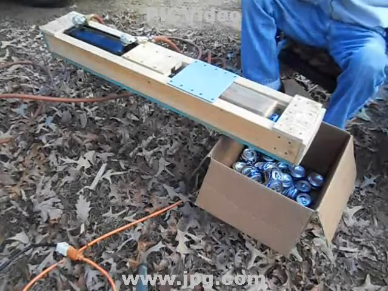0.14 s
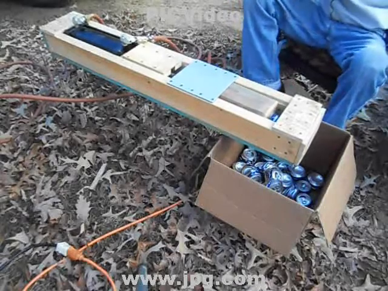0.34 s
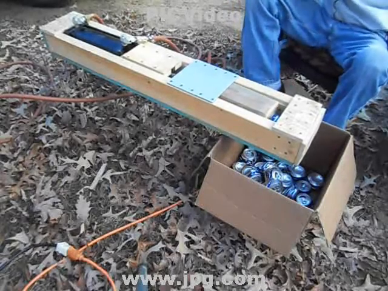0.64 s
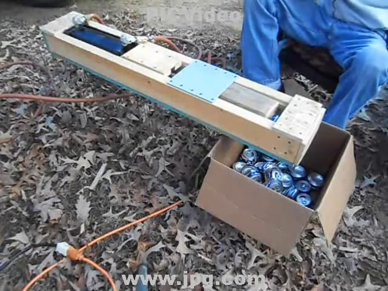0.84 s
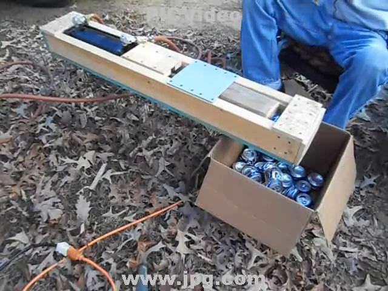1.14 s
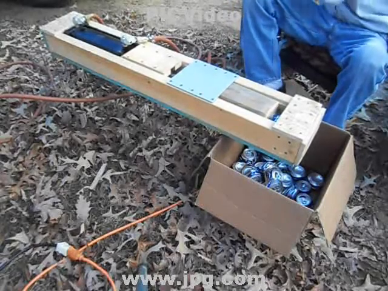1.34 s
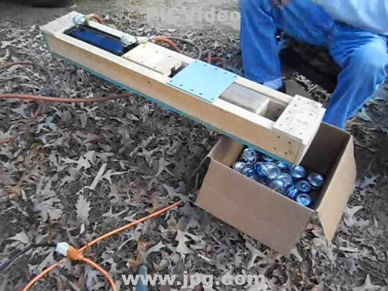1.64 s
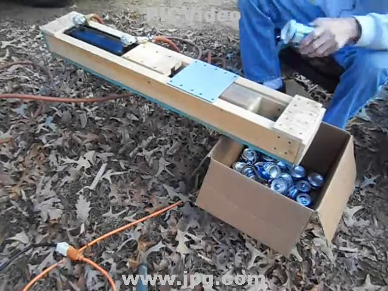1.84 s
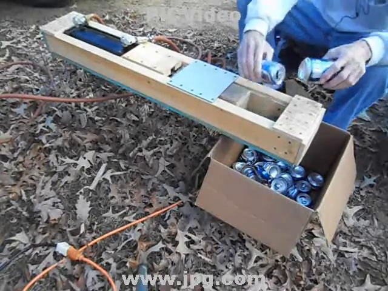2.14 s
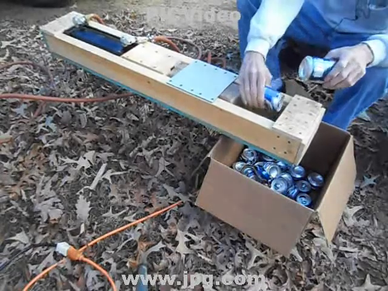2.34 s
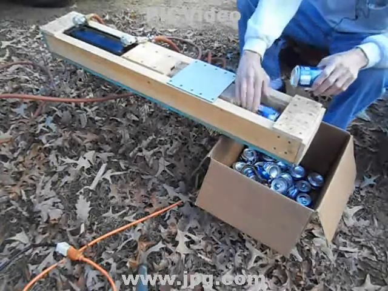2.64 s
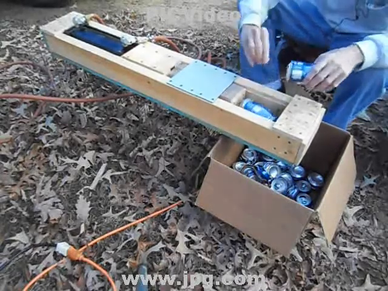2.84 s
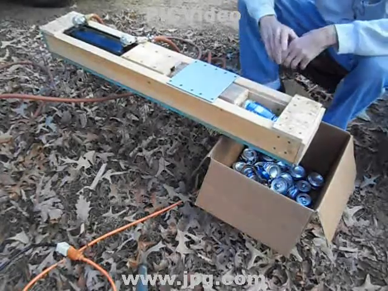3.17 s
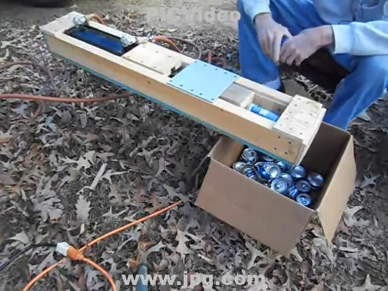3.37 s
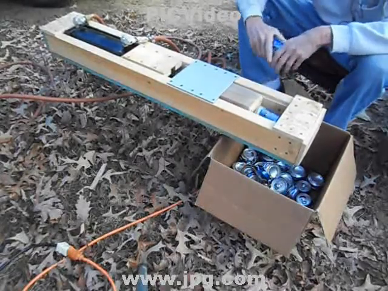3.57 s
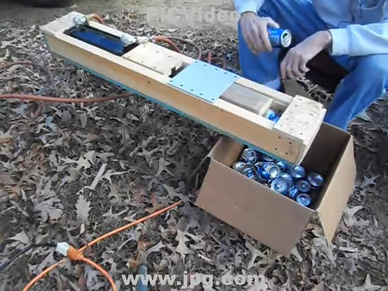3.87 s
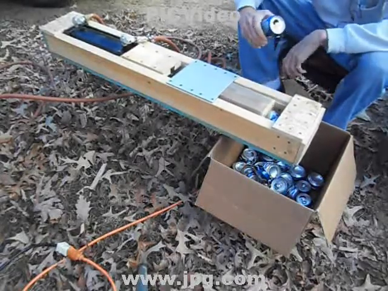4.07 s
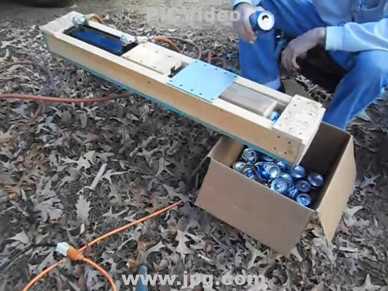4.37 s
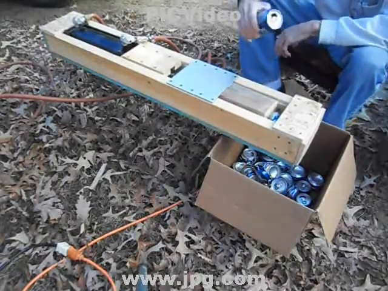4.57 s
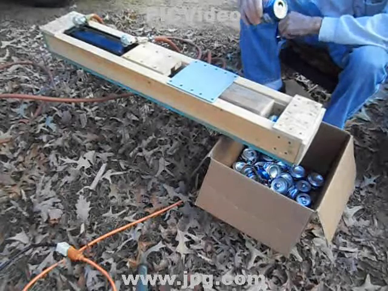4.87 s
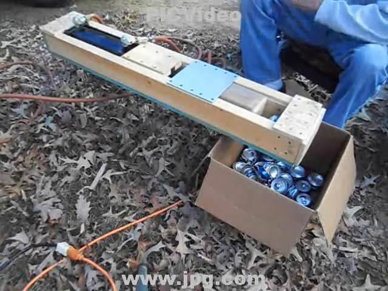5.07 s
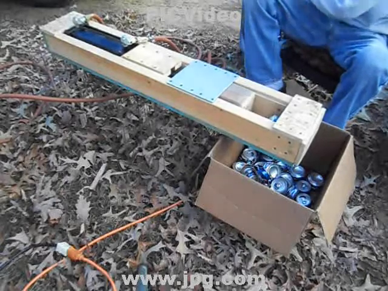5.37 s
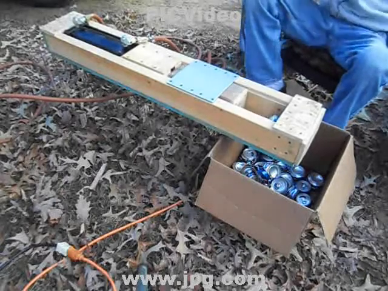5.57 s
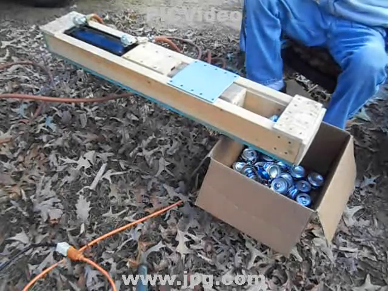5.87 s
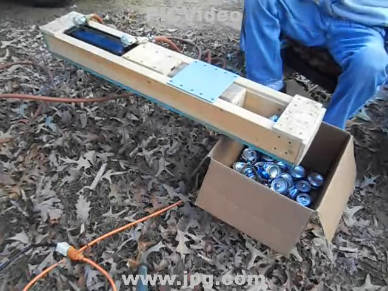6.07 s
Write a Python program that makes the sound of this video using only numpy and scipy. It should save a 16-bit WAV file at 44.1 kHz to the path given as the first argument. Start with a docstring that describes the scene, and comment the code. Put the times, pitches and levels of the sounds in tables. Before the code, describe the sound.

Close, dry outdoor sound of a compressed-air can crusher in a wooden trough. A dying hiss and sharp metal snaps, then a long bright vent as the ram slides back. An empty can drops in, bouncing with a tinny rattle; another hiss drives the ram, with dense crackling, wooden knocks and tiny squeaks. A faint whistle ends the air, then the ram vents back again.

```python
"""A home-made pneumatic can crusher, a wooden trough with an air cylinder, works outdoors on dry leaves.
As a crush stroke's hiss runs out, thin metal snaps; then the ram slides back while its valve vents noise
through a resonant port. A dropped can bounces as struck modes, then snaps, knocks and squeaks under the
next crush stroke; the air ends in a gliding whistle and the ram returns. Damped modes make the wooden
knocks; shaped noise makes the scrapes, the rustle of clothes and leaves, the rumble and the still air."""
import sys
import numpy as np
from scipy import signal
from scipy.fft import rfft, irfft
from scipy.io import wavfile
from scipy.ndimage import map_coordinates

SR = 44100
rng = np.random.default_rng(int(sys.argv[2]) if len(sys.argv) > 2 else 0)


def generate_wav(sig):
    """Save sig (samples, or channels by samples) to the path in sys.argv[1] as 16-bit PCM at SR."""
    pcm = np.round(np.clip(np.atleast_2d(sig).T, -1, 1) * 32767).astype(np.int16)
    wavfile.write(sys.argv[1], SR, pcm)


N = 273861
TIME = np.arange(N) / SR
BINS_HZ = np.maximum(np.arange(N // 2 + 1) * SR / N, 1)
CUTOFF_HZ = 15550

# All levels and spectral densities below are relative; each sound's own trims are added to them.
# Strokes in which the ram slides back:
# (valve opens [s], travel [s], hiss level [dB], surge of the full cylinder [dB])
RETURN_STROKES = [(1.243, 1.107, -19, 6), (4.676, 0.99, -19, 1.5)]
# Strokes in which the ram crushes a can:
# (valve opens [s], travel [s], hiss level [dB], surge of the full cylinder [dB])
CRUSH_STROKES = [(-0.98, 0.8, -16, 6), (2.972, 0.84, -18.5, 6)]
# Turbulence spectrum of each exhaust port: (frequency [Hz], density [dB per Hz])
RETURN_JET = [(150, -40.5), (300, -34.5), (600, -25.5), (1100, -23), (2600, -22.5), (3500, -13),
              (5500, -22), (7000, -24.5), (8400, -36.5), (11500, -40), (15000, -33.5)]
CRUSH_JET = [(150, -37), (400, -23), (900, -16.5), (2400, -16.5), (4300, -14.5), (6000, -9.5), (8200, -29),
             (11000, -24.5), (15000, -24)]
# Resonances and notches of each port and its air line: (centre [Hz], width [Hz], lift [dB])
RETURN_PORT = [(1334, 145, 13), (1730, 130, 9.5), (2327, 138, 11), (3017, 730, 6.5), (3468, 420, 9.5),
               (3834, 55, -10.5), (4155, 570, 12.5), (4706, 60, -8.5), (4780, 160, 11.5), (5020, 160, 10.5),
               (5475, 287, 13), (5950, 680, 5), (7200, 160, -12.5), (7600, 400, 1), (9170, 250, 6.5),
               (10070, 700, 15), (10540, 75, 11.5), (11460, 130, 14.5), (12060, 410, 17.5)]
CRUSH_PORT = [(1670, 110, 7), (2280, 90, 6), (3110, 710, 9), (4145, 630, 16.5), (4530, 68, -4.5),
              (4710, 250, 9), (4930, 240, 8.5), (5340, 64, 11), (5980, 130, 6.5), (6630, 140, 3.5),
              (7600, 380, 5.5), (9500, 580, 8)]
# Resonances in the first blast of a return stroke: (centre [Hz], width [Hz], lift [dB])
BLAST_PORT = [(1350, 160, 0.5), (2230, 260, 16), (3200, 690, 22.5), (5000, 460, 14.5), (6240, 340, 17),
              (7640, 950, 14.5), (9070, 480, 22.5), (9580, 610, 13), (12300, 1300, 12), (14800, 900, 17.5)]
# Faint whistle of the last leaking air: (time [s], frequency [Hz], level [dB])
WHISTLE = [(4.18, 7900, -65), (4.205, 8080, -57), (4.235, 7900, -56), (4.265, 7300, -54), (4.30, 6830, -68),
           (4.35, 6870, -64), (4.385, 7600, -58), (4.41, 8600, -68)]
# After the ram stops, the hiss falls as time squared; sizzle falls this many times as fast in dB
EMPTYING_DB_PER_S2, SIZZLE_FOLLOWS = 213, 1.28

# Edges of the hollow, crack and bright bands of a snap; the inner two also split the hiss: (edge [Hz])
BAND_EDGES_HZ = (900, 2600, 6600, 15000)
# Thin aluminium snapping and buckling: (time [s], crack level [dB], treble boost [dB])
SNAPS = [(0.0287, -20, -6), (0.0406, -20, -8.5), (0.0682, -32, -1), (0.0916, -27, -4), (0.2633, -43, 1),
         (0.408, -22.5, -11.5), (0.433, -27.5, -11), (0.6537, -27, -0.5), (0.7286, -12.5, -4),
         (0.8142, -26.5, 2), (1.1833, -3, -3.5), (1.235, -20, -17), (1.2466, -8, -21), (1.652, -19, 0.5),
         (3.365, -7, -40), (3.3726, -2, -16), (3.498, -12, -34), (3.5499, -3, -21), (3.5912, -6, -16),
         (3.6055, -5, -7.5), (3.6259, -10.5, -18), (3.7575, -10, -18), (3.7881, 0, -11), (3.7967, -3, -18),
         (3.8341, -5, -5), (3.952, -18.5, -0.5), (3.9648, -19, -4), (3.9712, -17, -20),
         (4.0149, -11.5, -22), (4.0591, -8, -5), (4.142, -24.5, -1), (4.151, -14, -4.5),
         (4.2039, -25.5, -19), (4.4857, -15, -11), (4.563, -20, -9.5), (4.6088, -37, -18)]
# Basic ring of a snap; the hollow band loses this many dB for each dB of treble boost
SNAP_T60_S, HOLLOW_TRADE = 0.022, 0.48
# The empty can lands and bounces: (time [s], ring level [dB], clatter level [dB], base thud level [dB])
CAN_BOUNCES = [(2.7306, -24, -20, -1), (2.738, -36.5, -22, -13), (2.754, -40.5, -21, -25),
               (2.769, -30.5, -21.5, -14), (2.910, -31.5, -32, -16)]
# Modes of the empty can: (frequency [Hz], level [dB], t60 [s])
CAN = [(1101, -3.5, 0.45), (1173, -9, 0.87), (1450, -9.5, 0.6), (1530, -15, 0.18), (1805, -6, .17),
       (2220, -9, 0.62), (2830, -13, .14), (2995, -12.5, 0.2), (3000, 3.5, .14), (3300, -2, 0.25),
       (3570, -4, .12), (4130, -1, 0.15), (4270, 6, 0.082), (4620, -2.5, 0.079)]
# Modes of the can's base, damped by the wood it hits: (frequency [Hz], level [dB], t60 [s])
CAN_BASE = [(770, -21, 0.016), (1020, -1.5, 0.034), (1094, -8, 0.031)]
# Metal slipping on the ram, one list a squeak: (time [s], frequency [Hz], level [dB])
SQUEAKS = [
    [(3.564, 2420, -28), (3.571, 2610, -14), (3.579, 2660, -26)],
    [(3.594, 2420, -31), (3.599, 2585, -16), (3.604, 2314, -16), (3.609, 2850, -10.5), (3.614, 3000, -39)],
]
# Harmonics of a squeak: (multiple of the pitch [1], level [dB])
SQUEAK_TONE = [(1, -1.5), (2, 0), (3, -5.5), (4, -30), (5, -10)]

# Knocks of ram and can in the trough: (time [s], level [dB], centre of the blow's excitation [Hz])
KNOCKS = [(0.499, -37.5, 900), (1.121, -35, 940), (1.246, -17, 464), (1.382, -23.5, 524), (1.653, -32, 620),
          (2.358, -26.5, 430), (2.732, -17.5, 970), (2.767, -21, 800), (2.825, -28, 900),
          (2.909, -20.5, 940), (2.986, -22, 950), (3.172, -30, 430), (3.187, -29.5, 910), (3.224, -23, 970),
          (3.292, -25, 990), (3.363, -15.5, 1150), (3.413, -24, 540), (3.448, -32, 600), (3.480, -24, 835),
          (3.497, -23.5, 740), (3.548, -25, 990), (3.715, -36, 450), (3.789, -32.5, 750),
          (3.821, -27.5, 1260), (4.016, -42, 875), (4.486, -44.5, 455), (4.806, -21.5, 410),
          (4.918, -26.5, 930), (5.703, -23.5, 520)]
# Response of the wooden trough: (frequency [Hz], level [dB])
TROUGH = [(150, -7), (270, 3.5), (340, -7), (440, 2.5), (540, -6), (700, 3.5), (1020, 0), (1300, 2),
          (1800, -5), (2600, -9.5)]
# Basic ring of a knock; the full blow builds up over this many cycles of its pitch
KNOCK_T60_S, CONTACT_CYCLES = 0.057, 2.75
# The light, hard touch that opens a knock: level and pitch relative to the full blow, and its rise
TOUCH_DB, TOUCH_RATIO, TOUCH_RISE_S = -9.5, 1.57, 0.0012
# The ram rubs along the trough: (start [s], end [s], level [dB])
SCRAPES = [(1.647, 1.767, -23.5), (2.334, 2.39, -30), (3.356, 3.436, -30), (3.474, 3.519, -29)]
# Spectrum of that rubbing: (frequency [Hz], density [dB per Hz])
SCRAPE = [(100, -8), (250, -9), (500, -11), (850, -2.5), (1500, -1.5), (3000, -4.5), (8000, -11.5),
          (15000, -30)]

# The operator shifts and handles cans:
# (start [s], length [s], rustle level [dB], dull rubbing level [dB])
MOVES = [(-0.05, 1.3, -56.5, -57), (0.216, 0.072, -49, -45.5), (0.492, 0.055, -52, -48),
         (0.728, 0.33, -47.5, -49), (0.903, 0.044, -41, -37.5), (1.044, 0.14, -41, -43.5),
         (2.6, 0.25, -40.5, -66), (2.856, 0.53, -36.5, -63), (5.935, 0.31, -46.5, -53),
         (6.17, 0.044, -48, -47)]
MOVE_ATTACK_S, MOVE_RELEASE_S = 0.013, 0.043
# Spectra of cloth and dry leaves, and of dull rubbing: (frequency [Hz], density [dB per Hz])
RUSTLE = [(500, -13), (1000, -0.5), (2000, -5.5), (4000, -3.5), (6500, -7.5), (10000, -12.5), (15000, -15)]
RUBBING = [(100, -18.5), (200, -5.5), (265, 2.5), (360, -8), (700, -8.5), (1100, -12.5), (2200, -42.5)]
# Swells of low rumble: (middle [s], half width [s], level [dB])
RUMBLES = [(0.93, 0.12, -57), (1.21, 0.06, -44), (3.6, 0.25, -60.5), (5.04, 0.072, -54), (6.12, 0.087, -55)]
RUMBLE_REST_DB, AIR_DB = -70.5, -56.5
# Spectra of the rumble and the still outdoor air: (frequency [Hz], density [dB per Hz])
RUMBLE = [(20, 6), (50, -6.5), (120, 0), (200, -8), (400, -23), (900, -49.5)]
AIR = [(25, -6.5), (160, -19.5), (300, -14.5), (550, -10), (850, -16.5), (2500, -20.5), (4000, -15),
       (6000, -21.5), (11000, -27), (15000, -19)]


def exhaust(strokes, jet, port, level_db, opening_s, surge_s, trend_db_per_s, sizzle_db, spit_db, spit_s,
            dulling_db_per_s, rush_db, rush_follows, flutter_db):
    """Turbulence in a resonant port: it spits on opening, dulls with travel and runs out treble first."""
    low, middle, high = three_bands(noise(jet, port))
    out = np.zeros(N)
    for stroke in strokes:
        age, travelling_db, fall_db = venting(stroke, surge_s, trend_db_per_s)
        opening = np.minimum(age / opening_s, 1)
        spit = spit_db * np.exp(-age / spit_s)
        high_db = sizzle_db + spit - dulling_db_per_s * age + SIZZLE_FOLLOWS * fall_db
        sizzle = from_db(high_db) * high
        rush = from_db(rush_db + rush_follows * fall_db) * low
        hiss = from_db(fall_db) * middle
        out += opening * from_db(travelling_db) * (hiss + sizzle + rush)
    return out * from_db(level_db + flutter_db * drift(150))


def venting(stroke, surge_s, trend_db_per_s):
    """Discharge of a cylinder: valve age, hiss level with its decaying surge, and fall after the ram stops."""
    start, travel_s, db, surge_db = stroke
    age = np.maximum(TIME - start, 0)
    travelling_db = db + surge_db * np.exp(-age / surge_s) + trend_db_per_s * age
    fall_db = -EMPTYING_DB_PER_S2 * np.maximum(age - travel_s, 0) ** 2
    return age, travelling_db, fall_db


def first_blast(level_db, rise_s, fade_s):
    """Exponential pressure decay: the full cylinder vents with a harsher colour that dies away."""
    pressure = np.zeros(N)
    pulse = np.minimum(TIME / rise_s, 1) ** 2 * np.exp(-TIME / fade_s)
    for start, _, hiss_db, surge_db in RETURN_STROKES:
        add(pressure, start, from_db(hiss_db + surge_db + level_db) * pulse)
    return pressure * noise(RETURN_JET, BLAST_PORT)


def glide(rows, harmonics, jitter, jitter_rate):
    """Frequency-modulated harmonic tone: an unsteady pitch from slipping metal or leaking air."""
    s, hz, db = np.transpose(rows)
    t = np.arange(s[0], s[-1], 1 / SR)
    unsteady_hz = np.interp(t, s, hz) * (1 + jitter * drift(jitter_rate)[:len(t)])
    phase = 2 * np.pi * np.cumsum(unsteady_hz) / SR
    tone = sum(from_db(level) * np.sin(round(k) * phase) for k, level in harmonics)
    envelope = from_db(np.interp(t, s, db)) * signal.windows.tukey(len(t), .2)
    out = np.zeros(N)
    add(out, s[0], envelope * tone / rms(tone))
    return out


def snaps(hollow_db, crack_db, bright_db, hollow_ring, rise_s, run_s, count=44):
    """Buckling of a thin shell: a running fold changes its shape, so each snap rings with new modes."""
    out, t = np.zeros(N), TIME[:SR // 12]
    # While the fold runs, a rising gain offsets the basic decay
    running = np.minimum(t / rise_s, 1) * from_db(60 * np.minimum(t, run_s) / SNAP_T60_S)
    ring_factors = (hollow_ring, .9, .8)
    for s, db, brightness in SNAPS:
        levels = (hollow_db - HOLLOW_TRADE * brightness, crack_db, bright_db + brightness)
        for low, high, part_db, lasts in zip(BAND_EDGES_HZ, BAND_EDGES_HZ[1:], levels, ring_factors):
            hz = scattered(low, high, count=count)
            gains = rng.rayleigh(1, count)
            t60 = SNAP_T60_S * lasts * rng.uniform(1.0, 1.38, count)
            modes = running * ring(hz, gains, t60, 1 / 10)[:len(t)]
            add(out, s, from_db(db + part_db) * modes / rms(modes[:SR // 200]))
    return out


def dropped_can(clatter_t60, clatter_hz, clatter_octaves, count=140):
    """Modal response to impact: at each bounce the base thuds, the thin wall clatters and a few modes ring."""
    out = np.zeros(N)
    wall_hz = scattered(900, 12000, count=count)
    wall_gains = 1 / (1 + (np.log2(wall_hz / clatter_hz) / clatter_octaves) ** 2)
    wall_gains = wall_gains / (1 + (wall_hz / 5200) ** 4)
    for s, ring_db, clatter_db, thud_db in CAN_BOUNCES:
        for modes, level_db in ((CAN, ring_db), (CAN_BASE, thud_db)):
            hz, db, t60 = np.transpose(modes)
            gains = from_db(db + level_db + rng.normal(0, 1, len(hz)))
            add(out, s, ring(hz, gains, t60, .5))
        wall_t60 = clatter_t60 * rng.uniform(0.41, 1.43, count)
        clatter = ring(wall_hz, wall_gains, wall_t60, 1 / 5)
        add(out, s, from_db(clatter_db) * clatter / rms(clatter[:SR // 100]))
    return out


def knocks(level_db, spread_octaves, count=48):
    """Contact excitation of damped modes: a hard touch, then a full blow, centred by contact hardness."""
    out, t = np.zeros(N), TIME[:int(SR / 6)]
    body_hz, body_db = np.transpose(TROUGH)
    for s, db, pitch_hz in KNOCKS:
        touch = (TOUCH_DB, pitch_hz * TOUCH_RATIO, TOUCH_RISE_S)
        full_blow = (0, pitch_hz, CONTACT_CYCLES / pitch_hz)
        for part_db, centre_hz, rise_s in (touch, full_blow):
            hz = scattered(body_hz[0], body_hz[-1], count=count)
            excitation = 1 / (1 + (np.log2(hz / centre_hz) / spread_octaves) ** 2)
            gains = from_db(np.interp(hz, body_hz, body_db)) * excitation
            t60 = KNOCK_T60_S * rng.uniform(0.76, 1.3, count)
            blow = ring(hz, gains, t60, 1 / 5)[:len(t)]
            blow = blow * np.sin(np.pi / 2 * np.minimum(t / rise_s, 1)) ** 2
            add(out, s, from_db(db + level_db + part_db) * blow / rms(blow[:SR // 100]))
    return out


def scrapes(grain_db):
    """Stick-slip friction of wood on wood, rendered as noise in uneven grains."""
    level = np.zeros(N)
    for start, end, db in SCRAPES:
        corners = [start, start + 0.0084, (start + end) / 2, end]
        level += from_db(db) * np.interp(TIME, corners, [0, 1, 1, 0])
    return level * from_db(grain_db * drift(250)) * noise(SCRAPE)


def radiated(x, lowest_hz):
    """Radiation efficiency: small bodies in the open give off little bass."""
    return signal.sosfilt(signal.butter(3, lowest_hz, "high", fs=SR, output="sos"), x)


def yard(x, level_db, t60, dull_hz):
    """Diffuse scattering: ground, box and trough add a short, dull, decaying tail."""
    t = TIME[:SR // 4]
    tail = rng.standard_normal(len(t)) * np.exp(-np.log(1000) * t / t60) * (t > .004)
    tail = signal.sosfilt(signal.butter(1, dull_hz, fs=SR, output="sos"), tail)
    tail = tail / np.sqrt(np.sum(tail ** 2))
    return x + from_db(level_db) * signal.fftconvolve(x, tail)[:N]


def movement(grain_db, rub_db):
    """Friction noise with powers summed: cloth and dry leaves rustle in grains over a dull rubbing."""
    rustle_power, rubbing_power = np.zeros((2, N))
    for start, length, rustle_db, rubbing_db in MOVES:
        attack = np.clip((TIME - start) / MOVE_ATTACK_S, 0, 1)
        effort = attack * np.exp(-np.maximum(TIME - start - length, 0) / MOVE_RELEASE_S)
        rustle_power += (from_db(rustle_db) * effort) ** 2
        rubbing_power += (from_db(rubbing_db) * effort) ** 2
    rustle = np.sqrt(rustle_power) * from_db(grain_db * drift(400)) * noise(RUSTLE)
    rubbing = np.sqrt(rubbing_power) * from_db(rub_db * np.tanh(drift(40))) * noise(RUBBING)
    return rustle + rubbing


def rumble():
    """Amplitude-modulated low noise: a faint rumble swells now and then."""
    swells = sum(from_db(db) * np.exp(-((TIME - s) / width) ** 2) for s, width, db in RUMBLES)
    return (from_db(RUMBLE_REST_DB) + swells) * noise(RUMBLE)


def still_air():
    """Stationary broadband noise: the steady outdoor background."""
    return from_db(AIR_DB) * noise(AIR)


def noise(spectrum, resonances=()):
    """Spectral shaping: noise of rms 1 with a broad spectrum, lifted or notched at resonances."""
    hz, db = np.transpose(spectrum)
    level = np.interp(np.log(BINS_HZ), np.log(hz), db)
    for centre, width, lift in resonances:
        level = level + lift / (1 + (2 * (BINS_HZ - centre) / width) ** 2)
    shaped = rfft(rng.standard_normal(N)) * from_db(level) * (BINS_HZ < CUTOFF_HZ)
    x = irfft(shaped, N)
    return x / rms(x)


def three_bands(x):
    """Band splitting: the low, middle and high part of a sound, each of rms 1."""
    spectrum, band = rfft(x), np.digitize(BINS_HZ, BAND_EDGES_HZ[1:3])
    parts = [irfft(spectrum * (band == k), N) for k in range(3)]
    return [p / rms(p) for p in parts]


def ring(hz, gains, t60, seconds):
    """Modal superposition: struck modes are exponentially decaying sines of random phase."""
    t = np.float32(TIME[:int(seconds * SR)])
    phase = np.float32(rng.uniform(0, 2 * np.pi, (len(hz), 1)))
    speed, damping = np.float32(2 * np.pi * hz), np.float32(np.log(1000) / t60)
    modes = np.sin(np.outer(speed, t) + phase) * np.exp(-np.outer(damping, t))
    return np.float32(gains) @ modes


def scattered(low_hz, high_hz, count):
    """Modal density: random mode frequencies strewn evenly in pitch over a band."""
    return low_hz * (high_hz / low_hz) ** ((np.arange(count) + rng.random(count)) / count)


def drift(rate):
    """Interpolated random process: a wander of spread 1 with this many knots a second."""
    knots = rng.standard_normal(4000)
    # Linear interpolation averages the variance down to 2/3
    return map_coordinates(knots, [TIME * rate], order=1, mode="wrap") / np.sqrt(2 / 3)


def from_db(db):
    """Logarithmic level: decibels to amplitude gain."""
    return 10 ** (np.asarray(db) / 20)


def rms(x):
    """Effective value: the root mean square."""
    return np.sqrt(np.mean(x ** 2) + 1e-20)


def add(out, s, sound):
    """Linear superposition: mix a sound in at a time in seconds."""
    i = max(round(s * SR), 0)
    out[i:i + len(sound)] += sound[:N - i]


def scene():
    """Superposition of exhausts, blows and background, the same in both channels."""
    air = exhaust(RETURN_STROKES, RETURN_JET, RETURN_PORT, level_db=0, opening_s=0.02, surge_s=0.25,
                  trend_db_per_s=2.0, sizzle_db=-18.0, spit_db=15.5, spit_s=0.038, dulling_db_per_s=2.5,
                  rush_db=-12.5, rush_follows=0.66, flutter_db=0.75)
    air = air + first_blast(level_db=-1.0, rise_s=0.024, fade_s=0.28)
    air = air + exhaust(CRUSH_STROKES, CRUSH_JET, CRUSH_PORT, level_db=-0.34, opening_s=0.014, surge_s=0.11,
                        trend_db_per_s=-10.0, sizzle_db=-9.5, spit_db=1.0, spit_s=0.05, dulling_db_per_s=8,
                        rush_db=-15.5, rush_follows=0.6, flutter_db=0.25)
    air = air + glide(WHISTLE, [(1, 0), (2, -6)], jitter=.014, jitter_rate=900)
    can = snaps(hollow_db=-27, crack_db=-11.0, bright_db=-6.0, hollow_ring=0.93, rise_s=0.00038, run_s=0.00083)
    can = can + dropped_can(clatter_t60=0.11, clatter_hz=3840, clatter_octaves=1.45)
    can = can + sum(glide(rows, SQUEAK_TONE, jitter=0.018, jitter_rate=2500) for rows in SQUEAKS)
    wood = knocks(level_db=-1.3, spread_octaves=0.46) + scrapes(grain_db=2.0)
    blows = yard(radiated(can + wood, lowest_hz=219), level_db=-20, t60=0.13, dull_hz=5000)
    background = movement(grain_db=2.5, rub_db=4.5) + rumble() + still_air()
    mono = air + blows + background
    return np.array([mono, mono])


def record(dry):
    """Overload and band limiting: the highest peaks clip and the top is cut."""
    clipped = np.clip(dry, -1, 1)
    return signal.sosfilt(signal.ellip(10, .2, 70, CUTOFF_HZ, fs=SR, output="sos"), clipped)


dry = scene()
out = record(dry)
generate_wav(out)
```